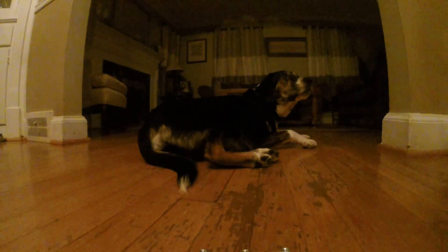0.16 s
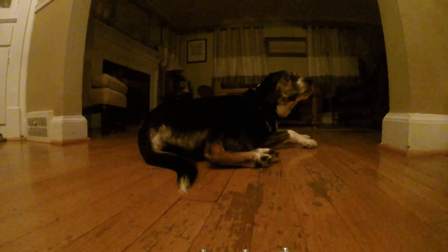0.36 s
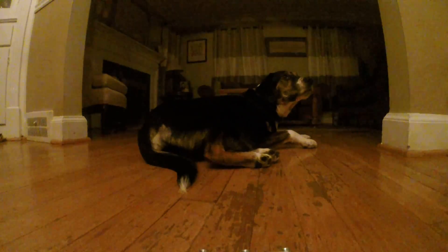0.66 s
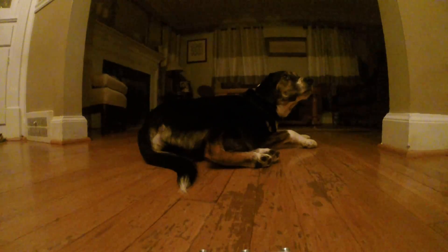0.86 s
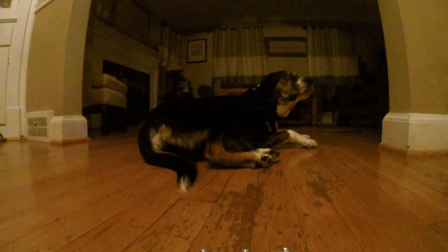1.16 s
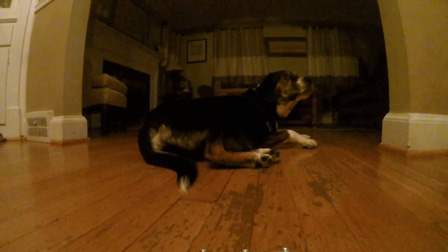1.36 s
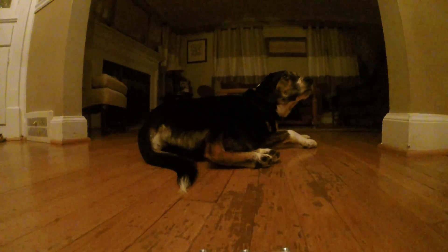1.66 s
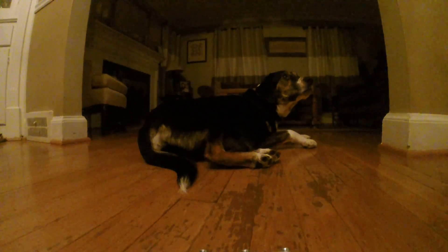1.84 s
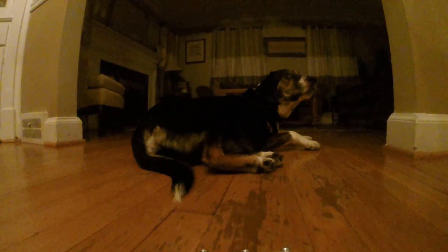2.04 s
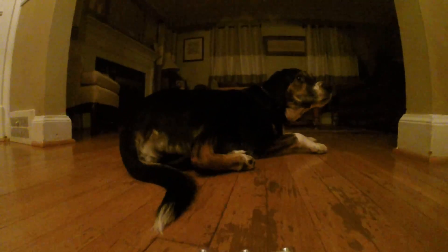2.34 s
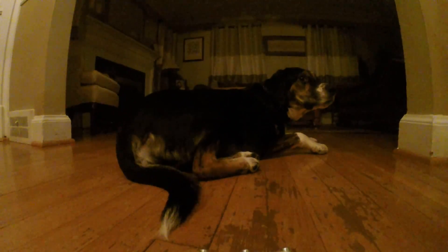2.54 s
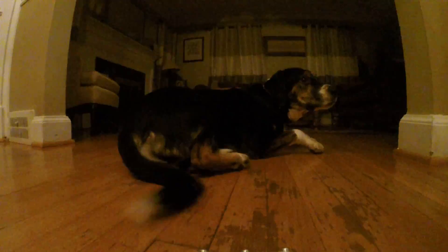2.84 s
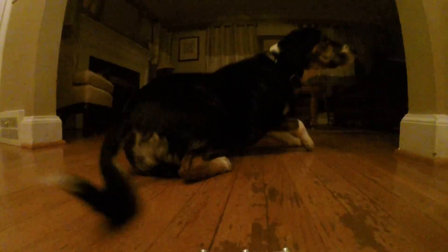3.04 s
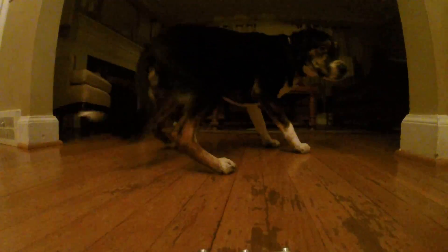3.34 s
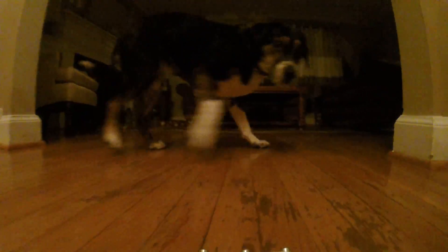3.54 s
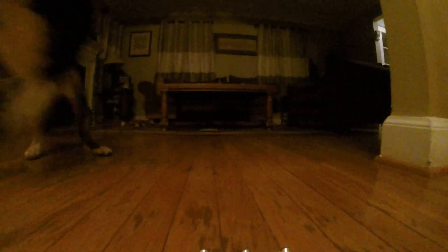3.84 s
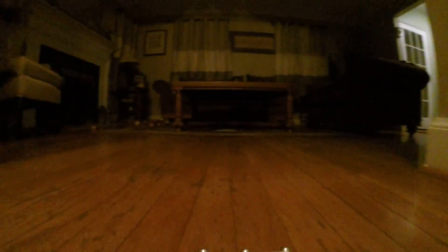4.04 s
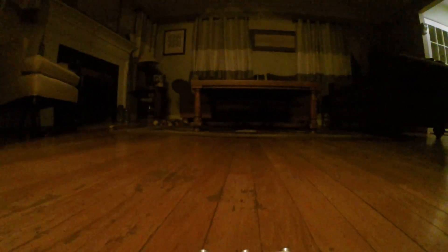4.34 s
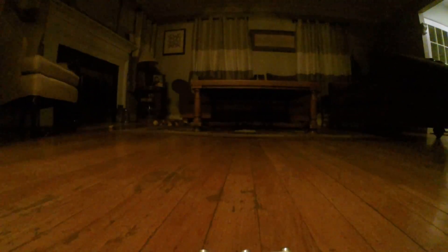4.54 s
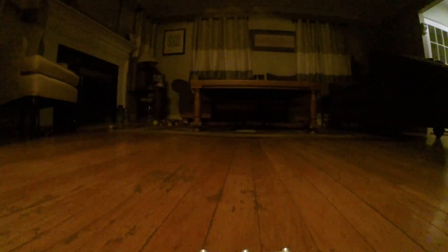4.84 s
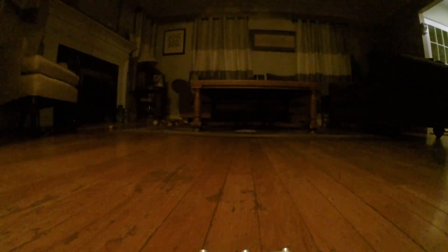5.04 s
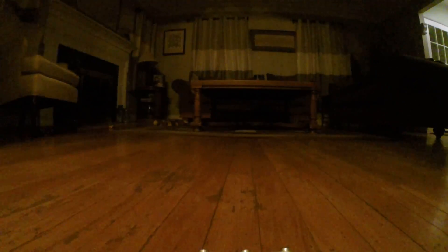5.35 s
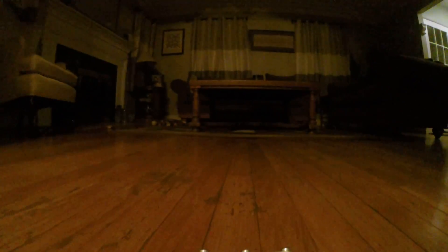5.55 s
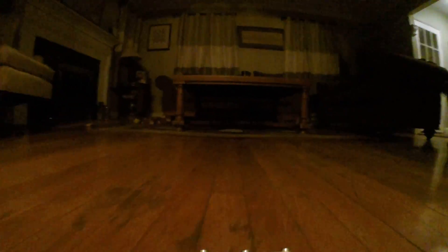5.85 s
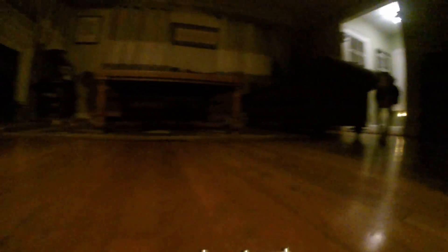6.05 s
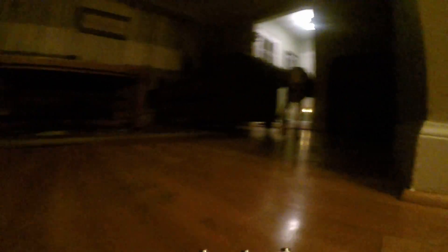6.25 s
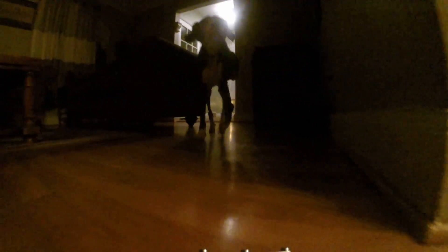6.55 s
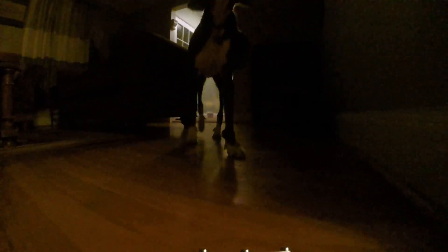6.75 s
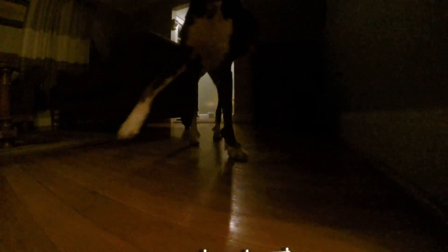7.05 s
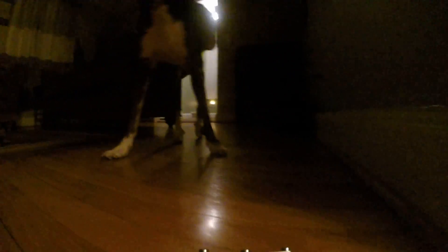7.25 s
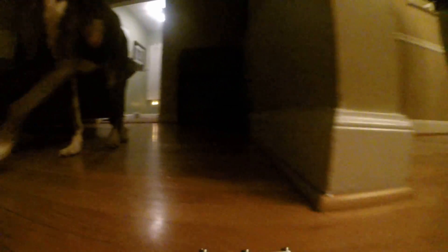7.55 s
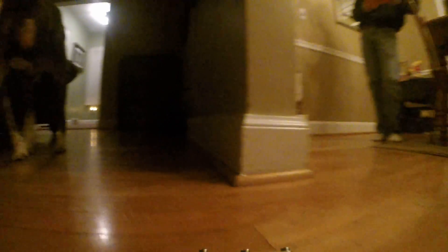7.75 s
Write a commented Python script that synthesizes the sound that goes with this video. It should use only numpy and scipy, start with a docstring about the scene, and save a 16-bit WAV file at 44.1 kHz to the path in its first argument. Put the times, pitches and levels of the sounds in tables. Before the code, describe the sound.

A sealed microphone rides on a small radio-controlled car on an indoor hardwood floor. Nearly two seconds of soft hiss with faint low thuds, then a hard plastic clack and short grinding spurts, each starting with knocks. A longer run follows, then a quiet pause with a small bump, and finally rougher, almost continuous driving with gear rattle, wheel rumble and brief thin motor whines.

```python
"""Hardwood floor: a small radio-controlled car drives in spurts, heard by a sealed microphone riding on it.
Gear teeth and backlash knocks shake the plastic chassis and ring its modes, with thin gliding tones on top;
the wheels rumble through the suspension and the body sways. The case muffles the treble, and the
microphone's own noise hisses between the spurts."""
import sys
import numpy as np
from scipy import signal
from scipy.fft import rfft, irfft
from scipy.io import wavfile
from scipy.ndimage import uniform_filter1d

SR = 44100
rng = np.random.default_rng(int(sys.argv[2]) if len(sys.argv) > 2 else 0)


def dump(signal):
    """Clip the signal to [-1, 1] and save it as 16-bit WAV at the path in sys.argv[1]."""
    limited = np.clip(np.atleast_2d(signal).T, -1, 1)
    pcm = np.round(limited * 32767).astype(np.int16)
    wavfile.write(sys.argv[1], SR, pcm)


N = 348390
TIME_S = np.arange(N) / SR
SPEED_REF_DB, SHAKE_REF_DB = -28, -15   # gear level and wheel shaking that the other levels are set against


def from_db(db):
    """Gain of a level."""
    return 10 ** (np.asarray(db) / 20)


def summed_db(*levels_db):
    """Level of unrelated sounds together: their powers add."""
    return 10 * np.log10(sum(from_db(db) ** 2 for db in levels_db))


def rms_one(x):
    """Scaled to rms 1."""
    return x / np.sqrt(np.mean(x ** 2) + 1e-20)


def evened(x, size=4410):
    """Held near rms 1 over each tenth of a second."""
    return x / np.sqrt(uniform_filter1d(x ** 2, size) + 0.062 * np.mean(x ** 2))


def dying(db, db_per_s):
    """A level that follows rises at once and falls no faster than the given rate."""
    fall_db = db_per_s * TIME_S
    return np.maximum.accumulate(db + fall_db) - fall_db


def drift(rate_hz):
    """Slow chance: noise twice through a one-pole low-pass, made at every 20th sample; spread 1."""
    r = np.exp(-40 * np.pi * rate_hz / SR)
    noise = rng.standard_normal(N // 20 + 2002)
    slow = signal.lfilter([1], [1, -2 * r, r * r], noise)[2000:]   # skip the filter's start
    return np.interp(np.arange(N) / 20, np.arange(len(slow)), rms_one(slow))


def contacts(per_s, spread_db):
    """Random clicks of uneven size and either sign; rms 1."""
    sizes = from_db(spread_db * np.minimum(rng.exponential(1, N), 5)) * rng.choice([-1, 1], N)
    hits = rng.random(N) < per_s / SR
    return rms_one(sizes * hits + 1e-9)


def resonate(x, hz, width_hz):
    """One mode as a two-pole resonance, gain 1 on top."""
    r = np.exp(-np.pi * max(width_hz, 5) / SR)
    return signal.lfilter(np.array([1, 0, -1]) * (1 - r * r) / 2, [1, -2 * r * np.cos(2 * np.pi * hz / SR), r * r], x)


def filtered(x, order, hz, kind="low"):
    """Through a Butterworth filter."""
    return signal.sosfilt(signal.butter(order, hz, kind, fs=SR, output="sos"), x)


# colour of the microphone noise: (frequency [Hz], relative density [dB])
HISS_COLOUR = [(30, -1.5), (170, -9.5), (400, -14), (1100, -19.5), (3200, -25.5), (5000, -30.5),
               (8000, -36.5), (10000, -39.5), (13000, -50.5), (15500, -68.5)]
HISS_DB = -56   # where nothing loud pushes it down


def hiss(car):
    """Microphone noise, which sinks while the car is loud above 500 Hz and soon comes back."""
    hz = np.arange(1, N // 2 + 2) * SR / N
    colour_hz, colour_db = np.transpose(HISS_COLOUR)
    colour = from_db(np.interp(np.log(hz), np.log(colour_hz), colour_db))
    noise = rms_one(irfft(rfft(rng.standard_normal(N)) * colour, N))
    car_power = uniform_filter1d(filtered(car, 2, 500, "high") ** 2, size=441)
    held_db = dying(10 * np.log10(car_power + 1e-12), db_per_s=113)
    sunk_db = 0.43 * np.maximum(held_db + 40.5, 0)
    return noise * from_db(HISS_DB - sunk_db)


# the standing car is rocked through the floor:
# (time [s], shaking of the wheels [dB], motion of the body before its sway and rock trims [dB])
FLOOR_NUDGES = [(0.003, -40, -27), (0.2, -50, -40), (0.431, -46.5, -43), (0.55, -44, -60),
                (1.05, -34.5, -52), (1.57, -56, -67), (1.721, -45, -63), (1.81, -46, -65),
                (4.956, -33.5, -45), (5.05, -46.5, -44.5), (5.37, -53.5, -40.5), (5.49, -47, -44)]
NUDGE_RISE_S = 0.018   # time in which a nudge climbs its last 20 dB
NUDGE_WHEELS_DB_PER_S, NUDGE_BODY_DB_PER_S = 202.5, 82   # settling


def nudges():
    """Shaking of the wheels and of the body: each nudge swells quickly and settles at a steady rate."""
    nudge_db = np.full((2, N), -120.)
    for s, *peak_db in FLOOR_NUDGES:
        rise_db = 20 * (s - TIME_S) / NUDGE_RISE_S
        settle_db = np.outer([NUDGE_WHEELS_DB_PER_S, NUDGE_BODY_DB_PER_S], TIME_S - s)
        loss_db = np.where(TIME_S < s, rise_db, settle_db)
        nudge_db = np.maximum(nudge_db, np.array(peak_db)[:, None] - loss_db)
    return nudge_db


# wheels on their springs: (frequency [Hz], width [Hz], level [dB])
WHEEL_SPRINGS = [(63.6, 18, -5.5), (88, 15, 0), (105.1, 22.8, -1.5)]
SPRING_TOP_HZ = 128
SWAY_HZ, SWAY_WIDTH_HZ = 27.4, 11.5
ROCK_HZ, ROCK_WIDTH_HZ = 44, 8   # the nudged body also rocks faster than it sways


def suspension(bounce_db, sway_db, rock_db):
    """Floor unevenness bounces the wheels on their springs; the body sways and rocks as noise-driven modes."""
    bumps = contacts(200, spread_db=4.5)
    bounce = 0
    for k, (hz, width_hz, db) in enumerate(WHEEL_SPRINGS):
        bounce = bounce + (-1) ** k * from_db(db) * resonate(resonate(bumps, hz, 7.0 * width_hz), hz, width_hz)
    bounce = filtered(bounce, 4, SPRING_TOP_HZ)   # soft tyres
    sway = resonate(resonate(rng.standard_normal(N), SWAY_HZ, SWAY_WIDTH_HZ), SWAY_HZ, 6.8 * SWAY_WIDTH_HZ)
    rock = resonate(resonate(rng.standard_normal(N), ROCK_HZ, ROCK_WIDTH_HZ), ROCK_HZ, 2.6 * ROCK_WIDTH_HZ)
    # the body's mass rounds off jolts
    bounce_db, sway_db, rock_db = uniform_filter1d([bounce_db, sway_db, rock_db], size=300)
    return from_db(bounce_db) * evened(bounce) + from_db(sway_db) * evened(sway) + from_db(rock_db) * evened(rock)


# modes ring up or sink for a moment:
# (middle [s], length [s], frequency [Hz], change of level [dB])
MODE_SWELLS = [(0.01, 0.017, 430, 32), (0.538, 0.033, 325, 23), (0.547, .02, 430, 19),
               (1.934, 0.013, 960, 5), (1.941, 0.024, 203, 6), (1.944, 0.016, 324, -6),
               (2.03, 0.037, 1590, 5.5), (2.791, .012, 322, -7.5), (3.556, .05, 1590, 4),
               (3.7, 0.062, 2550, 2.5), (4.087, 0.049, 2550, 4), (1.94, .02, 443, -4),
               (2.206, 0.045, 322, 7), (2.3, 0.13, 2230, 8.5), (2.784, 0.0058, 2560, 9.5),
               (2.814, 0.019, 494, 12), (2.925, .01, 940, 8), (3.05, 0.068, 2500, 1),
               (3.656, 0.12, 1590, 2.5), (3.688, 0.054, 322, 1), (3.812, 0.039, 324, -4),
               (3.92, 0.029, 2550, 6), (3.921, 0.033, 197, 8), (3.969, 0.096, 438, 10.5),
               (4.114, 0.051, 430, 12), (4.14, 0.099, 2230, 8.5), (4.12, 0.015, 1570, 12),
               (4.186, 0.061, 322, 10.5), (4.34, 0.038, 322, 6.5), (4.349, 0.017, 1590, 14),
               (2.787, .012, 950, -6), (2.157, .015, 1590, 7), (4.6, .02, 680, 8), (4.585, .015, 950, -7),
               (5.125, .015, 1250, 7), (5.125, .015, 980, -4), (5.66, .07, 1600, 5), (6.74, .02, 2230, 7),
               (3.445, .01, 950, 5), (5.776, 0.11, 2640, 4), (5.8, 0.052, 322, 3.5),
               (5.817, 0.12, 1590, 2.5), (5.966, 0.037, 2540, 5), (6.152, 0.26, 6400, 2.5),
               (6.117, 0.025, 324, -2.5), (6.263, 0.049, 322, -2.5), (6.442, 0.016, 1590, 0),
               (6.61, 0.14, 325, -2), (6.632, .02, 660, 14), (6.72, 0.13, 5300, -5),
               (7.204, 0.28, 5300, -7.5), (7.01, 0.053, 322, 7.5), (7.093, 0.066, 2230, 7.5),
               (7.518, 0.16, 322, 6), (7.571, 0.034, 2600, 4.5), (7.578, 0.028, 1000, 6),
               (7.718, .05, 420, 6.5), (7.631, 0.024, 322, -4), (7.734, 0.045, 334, 6),
               (7.754, 0.048, 680, 13.5), (7.82, 0.15, 2230, 9.5)]
SWELL_REACH = 0.087   # reach in pitch, as a share of it


def swelling(hz):
    """Gain of the mode at this pitch from moment to moment; near neighbours take part."""
    t = np.arange(0, N + 64, 64) / SR
    db = 0
    for s, length, near_hz, more_db in MODE_SWELLS:
        off_pitch = np.log(hz / near_hz) / SWELL_REACH
        db = db + more_db * np.exp(-((t - s) / length) ** 2 - off_pitch ** 2)
    return from_db(np.interp(TIME_S, t, db))


# knocks through the chassis, from gear backlash and wheels on board joints: (time [s], strength [dB],
# weight in the low modes [dB], edge in the stiff parts [dB], rattle length before limits [s])
CHASSIS_KNOCKS = [(1.886, -39.5, -4, 15, 0.0014), (1.927, -14, 3, -6, 0.0094), (1.933, 5, 0.5, -9, 0.0032),
                  (1.942, -23, 0.5, -3, .0015), (1.958, -16, 9, -6, 0.004), (2.008, -17, 3, -11, 0.0011),
                  (2.093, -11, 3, -8, 0.0015), (2.179, -1.5, -1.5, -7, 0.0014),
                  (2.201, -18, 18, -1, 0.0022), (2.26, -25, -1, -12, 0.001), (2.292, -14, 1, -7, 0.0011),
                  (2.315, -15.5, 2, -3, 0.0027), (2.367, -12, -9, -11, 0.0013),
                  (2.387, -13.5, -11, -22, 0.0022), (2.497, -14, -5, -12, 0.005),
                  (2.776, -17.5, 2, -21, 0.0089), (2.7834, 6, -3, -2.5, 0.0023),
                  (2.788, -10.5, 12, 1, 0.011), (2.9193, -14.5, 16.5, 7.5, 0.0028),
                  (2.92, 1.5, -6, -28, 0.0037), (2.944, -20.5, 16.5, -3, 0.0016),
                  (2.988, -16.5, -1, -14, .003), (3.077, 0.5, -2.5, -12.5, 0.0024),
                  (3.096, -26.5, 29.5, -11, 0.0059), (3.133, -32, -2, -11, 0.0011),
                  (3.214, -10, -12, -10, 0.0045), (3.259, -25, -1, -5, 0.0023),
                  (3.275, -10, -7.5, -15, 0.0032), (3.3994, -8.5, -5, -13, 0.011),
                  (3.439, 0, 3, -11, 0.0032), (3.466, -6, 3, -5, 0.0017), (3.725, -17, 5, 4, .002),
                  (3.879, -14, -2, -2, 0.00072), (3.989, 1.5, -6, -7, 0.0026), (4.236, -22, -5, -9, 0.0023),
                  (4.276, -3.5, -4.5, -9.5, 0.0015), (4.306, -6, 3, 2, 0.024), (4.362, -17, 2, -6, 0.003),
                  (4.472, -18.5, -14, -16, 0.0011), (4.58, -9, -4, -12.5, 0.0071),
                  (4.655, -26, -4, -8, 0.0019), (4.69, -38, 0, 6, 0.00077), (5.112, -11.5, 5.5, -7, 0.0084),
                  (5.1227, -11.5, -0.5, -6.5, 0.0065), (5.14, -25.5, 11, -1.5, 0.0049),
                  (5.18, -20.5, -7, -19, 0.0017), (5.536, -14, 12.5, -6.5, 0.0067),
                  (5.604, -16, -2, -10.5, 0.0056), (5.633, -12, -13, -14, 0.0052),
                  (5.788, -15.5, 3, 5, 0.00052), (5.902, -11, -2.5, -1.5, 0.0011),
                  (6.003, -7, 8, -2, 0.0036), (6.078, -16, -2, 5, 0.0011), (6.12, -13.5, -7, 3, 0.00098),
                  (6.183, -18.5, 2, 8, 0.0016), (6.298, -15, 12, -4, 0.0019), (6.33, -20, 13, -8, 0.00093),
                  (6.346, -4, -1, -4, 0.00098), (6.387, -13.5, 2, 2.5, 0.00076), (6.405, -15, 0, 0, 0.0012),
                  (6.426, -1, -3, -8, 0.0008), (6.454, -10.5, 15, -6, 0.0008),
                  (6.481, 1.5, 0, -5.5, 0.0018), (6.5025, -10, 3, 0, 0.001), (6.5085, -22, -2, 8, 0.0004),
                  (6.578, -24.5, -1, 4, 0.00086), (6.596, -4, -6, -4, 0.001), (6.54, -15, -3, -3, 0.0026),
                  (7.107, -13, -8, -4, 0.0023), (7.417, -19, 6, 6, 0.0011), (7.606, -8.5, -3, 1, 0.0007)]
MIDDLE_SHARE = 0.67   # share of a knock's low weight that the middle modes take
CLEAN_S = 0.002   # the shorter a knock is against this, the more it is one sharp contact


def knock_force(low_share=0, edge_share=0, trim_db=0.0):
    """Each blow is a short rattle of contacts that rises fast and dies; a short one packs into a higher peak."""
    force, t = np.zeros(N + 2000), np.arange(2000) / SR
    for s, db, low_db, edge_db, length in CHASSIS_KNOCKS:
        length = np.clip(length, 0.0004, 0.02)
        shape = (1 - np.exp(-5.0 * t / length)) * np.exp(-t / length) * np.sqrt(0.0016 / length)
        energy = np.sum(shape ** 2)
        clean = np.exp(-length / CLEAN_S)   # share of the single contact
        blow = np.sqrt(1 - clean) * rng.standard_normal(2000) * shape
        blow[round(length * SR / 2)] -= np.sqrt(clean * energy)
        blow *= np.sqrt(energy / np.sum(blow ** 2))
        level_db = db + low_share * low_db + edge_share * edge_db + trim_db
        force[round(s * SR):][:2000] += from_db(level_db) * blow
    return force[:N]


# spurts of driving, one list each: (time [s], gear train level that stands for speed [dB], wheel shaking [dB])
DRIVING_SPURTS = [
    [(1.935, -44.5, -16), (2.123, -29, -18), (2.2, -29.5, -14), (2.27, -33.5, -24.5), (2.34, -35, -20),
     (2.36, -40.5, -22), (2.375, -37, -22.5), (2.41, -39.5, -31.5), (2.505, -54.5, -22.5)],
    [(2.786, -54, -16.5), (2.838, -51, -22.5), (2.88, -74, -33.5)],
    [(2.922, -44, -14), (2.988, -43, -36), (3.046, -33, -16), (3.132, -33.5, -19.5), (3.18, -40, -22.5),
     (3.244, -57, -20), (3.385, -66.5, -33)],
    [(3.404, -40, -21.5), (3.46, -47.5, -13), (3.584, -33.5, -19.5), (3.78, -27.5, -12), (3.864, -25, -15),
     (4.0, -28, -13.5), (4.168, -31.5, -20.5), (4.37, -37.5, -27.5), (4.4, -44.5, -18), (4.513, -70, -30)],
    [(4.582, -39, -24), (4.67, -65.5, -29.5), (4.74, -69.5, -37.5)],
    [(5.114, -71, -31), (5.142, -50, -25), (5.184, -59.5, -32.5), (5.26, -74, -45)],
    [(5.541, -65, -10), (5.605, -41, -21), (5.717, -27, -13.5), (5.93, -27.5, -15), (6.089, -26, -12.5),
     (6.327, -28.5, -15.5), (6.405, -28, -13), (6.42, -36, -21), (6.435, -28, -12.5), (6.5, -35.5, -11),
     (6.56, -30, -23.5), (6.605, -33.5, -13), (6.65, -30.5, -29.5), (6.825, -32.5, -16)],
    [(6.85, -56, -26), (6.885, -48.5, -40), (6.967, -35, -29), (7.109, -32.5, -24.5), (7.225, -31.5, -25),
     (7.337, -27.5, -19), (7.58, -25, -14.5), (7.9, -27, -14.5)],
]


def spurts():
    """Gear train and wheel shaking levels, gliding from point to point; silent between the spurts."""
    gear_db, shake_db = np.full(N, -120.), np.full(N, -120.)
    for spurt in DRIVING_SPURTS:
        s, gear, shake = np.transpose(spurt)
        on = (TIME_S >= s[0]) & (TIME_S <= s[-1])
        gear_db[on] = np.interp(TIME_S[on], s, gear)
        shake_db[on] = np.interp(TIME_S[on], s, shake)
    return gear_db, shake_db


GEAR_STOP_DB_PER_S, WHEEL_SETTLE_DB_PER_S, BODY_SETTLE_DB_PER_S = 898.5, 192.5, 117   # dying away after a spurt
REST_WHEELS_DB, REST_BODY_DB, REST_TYRES_DB = -60.5, -68.5, -70.5
# tyre roll and body sway: level at the reference speed and shaking, and the share of each that they follow
ROLL_DB, ROLL_BY_SPEED, ROLL_BY_SHAKE = -25.5, 0.6, 0.51
SWAY_DB, SWAY_BY_SHAKE = -17, 0.76
NUDGE_TYRES_DB, NUDGE_SWAY_DB, NUDGE_ROCK_DB = -28, -5.0, -2   # trims on the nudges


def driving():
    """Gear, tyre, wheel, sway and rock levels: spurts set speed and shaking, nudges and rest add to them."""
    gear_db, shake_db = spurts()
    nudge_wheels_db, nudge_body_db = nudges()
    sway_db = dying(SWAY_DB + SWAY_BY_SHAKE * (shake_db - SHAKE_REF_DB), BODY_SETTLE_DB_PER_S)
    sway_db = summed_db(sway_db, nudge_body_db + NUDGE_SWAY_DB, REST_BODY_DB)
    gear_db = dying(gear_db, GEAR_STOP_DB_PER_S)
    shake_db = summed_db(dying(shake_db, WHEEL_SETTLE_DB_PER_S), nudge_wheels_db, REST_WHEELS_DB)
    roll_db = ROLL_DB + ROLL_BY_SPEED * (gear_db - SPEED_REF_DB) + ROLL_BY_SHAKE * (shake_db - SHAKE_REF_DB)
    roll_db = summed_db(roll_db, nudge_wheels_db + NUDGE_TYRES_DB, REST_TYRES_DB)
    return gear_db, roll_db, shake_db, sway_db, nudge_body_db + NUDGE_ROCK_DB


# how hard the motor pulls, which shifts the ring between chassis modes: (time [s], pull [dB])
MOTOR_PULL = [(1.95, 1.5), (2.35, 3.5), (2.5, 5), (3.0, 1), (3.25, 2), (3.869, 0), (4.2, -2), (5.6, 8),
              (5.72, -0.7), (6.351, -2.5), (6.799, -2), (7.0, -1), (7.9, -5.5)]


def pulling():
    """Motor pull, gliding from point to point."""
    return np.interp(TIME_S, *np.transpose(MOTOR_PULL))


# chassis modes: (frequency [Hz], width [Hz], level [dB], share of the motor pull felt [ratio])
CHASSIS_MODES = [(194.3, 33, -4.5, -0.045), (321.9, 28.3, 2.5, 0.25), (424.7, 15, -4.5, 0.02),
                 (475, 42, -9.5, 0.53), (577, 31, -8.5, -0.16), (651.34, 69, -1, 0.35), (951, 111, 1, 0.8),
                 (1127, 33, 1, 0.97), (1255, 110, -3, 0.95), (1469, 43, -3, -0.5), (1577.6, 57, 2, .9),
                 (1846, 200, -4, 0.48), (2220, 105, -1, -0.15), (2540, 88, 2, 0.35),
                 (2676, 300, -8.5, -0.19), (3097, 100, -10, -0.81)]
LOW_HZ, MIDDLE_HZ, CASE_HZ = 651.2, 1950, 3300   # tops of the low and middle modes, and of the case


def plastic(teeth, tyres, pull_db):
    """Gear teeth shake the upper modes, tyres the low ones; knocks ring all, a touch more damped."""
    low_knocks = knock_force(low_share=1, trim_db=17.0)
    middle_knocks = knock_force(low_share=MIDDLE_SHARE, trim_db=9.0)
    high_knocks = knock_force(trim_db=9)
    out = np.zeros(N)
    for k, (hz, width_hz, db, share) in enumerate(CHASSIS_MODES):
        swell = swelling(hz)
        drive = tyres if hz < LOW_HZ else teeth
        knocks = low_knocks if hz <= LOW_HZ else middle_knocks if hz <= MIDDLE_HZ else high_knocks
        coupling = from_db(share * pull_db + 1.2 * drift(8.6))   # uneven from moment to moment
        ring = resonate(drive * coupling * swell, hz, width_hz) + resonate(knocks * swell, hz, 1.02 * width_hz)
        out += (-1) ** k * from_db(db) * ring
    return out


# small stiff parts heard through the case: (frequency [Hz], width [Hz], level [dB])
STIFF_PARTS = [(3315, 400, -23), (4210, 590, -31), (4490, 220, -31), (4614, 250, -33), (5170, 220, -45),
               (5350, 250, -47.5), (5640, 350, -45.5), (5890, 250, -42.5), (6120, 190, -41.5),
               (6350, 270, -40.5), (6630, 160, -49), (6900, 270, -51), (8000, 1000, -82)]


def stiff_parts(sharp):
    """Narrow treble modes, each a resonance passed twice."""
    out = np.zeros(N)
    for k, (hz, width_hz, db) in enumerate(STIFF_PARTS):
        ring = resonate(resonate(sharp * swelling(hz), hz, width_hz), hz, width_hz)
        out += (-1) ** k * from_db(db) * ring
    return out


# the loose panel buzzes: (middle [s], length [s], level above rest [dB])
PANEL_BUZZES = [(2.256, 0.2, 10), (3.716, 0.025, 12.5), (4.227, 0.0087, 24.5), (5.982, 0.038, 18.5),
                (6.345, 0.06, 21)]
BUZZ_REST_DB = -4.5
PANEL_HZ, PANEL_WIDTH_HZ, PANEL_DB = 861, 26, 4.5


def loose_panel(teeth):
    """A panel that the gear teeth ring, swelling in and out around each buzz."""
    buzz_db = BUZZ_REST_DB + sum(db * np.exp(-((TIME_S - s) / length) ** 2) for s, length, db in PANEL_BUZZES)
    return from_db(PANEL_DB) * resonate(teeth * from_db(buzz_db), PANEL_HZ, PANEL_WIDTH_HZ)


TEETH_PER_S, GRIT_PER_S, TYRE_CONTACTS_PER_S = 2500, 82, 600
GRIT_DB, GRIT_EDGE_DB = 2.5, 1   # chance ticks under rolling wheels, on the gear level; extra for stiff parts
CRACK_HZ, CRACK_DB = [3300, 6700], -46   # the snap of a knock through the case
EDGE_BY_SPEED = 0.2   # the stiff parts brighten with speed


def chassis(gear_db, roll_db, pull_db):
    """Teeth, grit, tyres and knocks are trains of contacts that ring the plastic, the panel and the stiff parts."""
    teeth = contacts(TEETH_PER_S, spread_db=-1.0) * from_db(gear_db + 14.5 + 1.7 * drift(68))
    grit = contacts(GRIT_PER_S, spread_db=1.0) * from_db(gear_db + GRIT_DB)
    tyres = contacts(TYRE_CONTACTS_PER_S, spread_db=-0.5) * from_db(roll_db + 23.5 + 1.1 * drift(42))
    teeth = teeth + grit
    body = plastic(teeth, tyres, pull_db) + loose_panel(teeth)
    muffled = filtered(body, 8, CASE_HZ)   # the sealed case
    snaps = knock_force(edge_share=1, trim_db=18.0)
    crack = from_db(CRACK_DB) * filtered(snaps + 1e-18, 4, CRACK_HZ, "band")
    edge = from_db(EDGE_BY_SPEED * (gear_db - SPEED_REF_DB))
    sharp = (teeth + from_db(GRIT_EDGE_DB) * grit) * edge + snaps
    return muffled + crack + stiff_parts(sharp)


# thin motor and gear tones: (start [s], end [s], start pitch [Hz], end pitch [Hz], level before flicker [dB])
MOTOR_TONES = [(2.795, 2.896, 2340, 2350, -62), (2.84, 2.935, 1850, 1860, -59),
               (5.948, 6.047, 870, 836.5, -32), (6.056, 6.132, 2196, 2166, -28.5),
               (6.087, 6.42, 745, 873, -29.5), (6.155, 6.408, 250, 307.3, -23.5),
               (6.1, 6.346, 492, 572, -35), (7.148, 7.307, 340, 323, -24.5), (7.45, 7.59, 295, 337, -22.5),
               (7.392, 7.49, 425, 417, -24.5), (7.44, 7.6, 1290, 1550, -34)]


def whine():
    """Sines that glide from one pitch to another, wavering slightly in pitch and flickering in level."""
    out, waver, flicker_db = np.zeros(N), 1 + 0.003 * drift(15), 1.2 * drift(25)
    for start, end, start_hz, end_hz, db in MOTOR_TONES:
        turns = np.cumsum(np.interp(TIME_S, [start, end], [start_hz, end_hz]) * waver) / SR
        fade = np.clip(np.minimum(TIME_S - start, end - TIME_S) / 0.016, 0, 1)
        out += from_db(db + flicker_db) * np.sin(2 * np.pi * turns) * fade
    return out


def scene():
    """The car and the hiss."""
    gear_db, roll_db, bounce_db, sway_db, rock_db = driving()
    car = suspension(bounce_db, sway_db, rock_db) + chassis(gear_db, roll_db, pulling()) + whine()
    return (car + hiss(car))[None]


CUTOFF_HZ = 15500


def record(dry):
    """Only the highest peaks are flattened; the top is cut."""
    flat = dry / (1 + np.abs(dry) ** 10) ** (1 / 10)
    return signal.sosfilt(signal.cheby2(12, 70, CUTOFF_HZ, fs=SR, output="sos"), flat)


dry = scene()
out = record(dry)
dump(out)
```